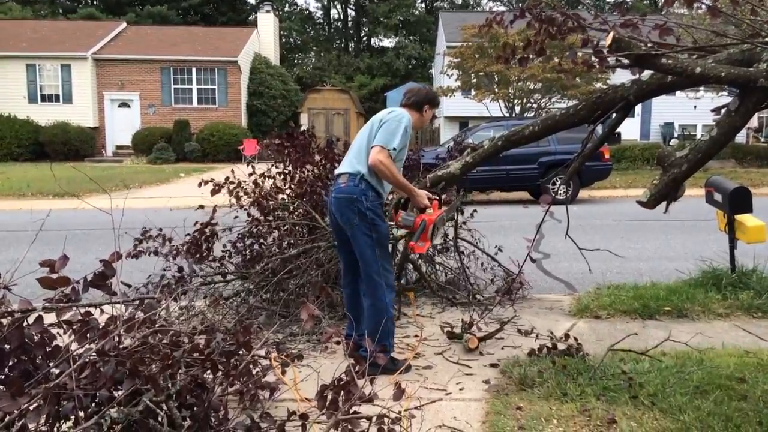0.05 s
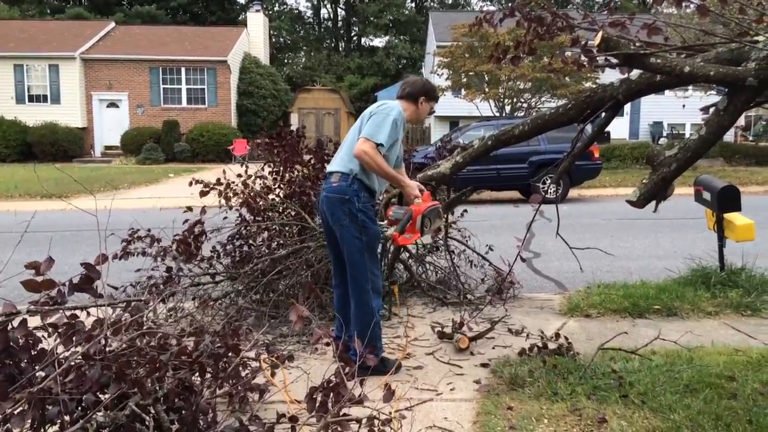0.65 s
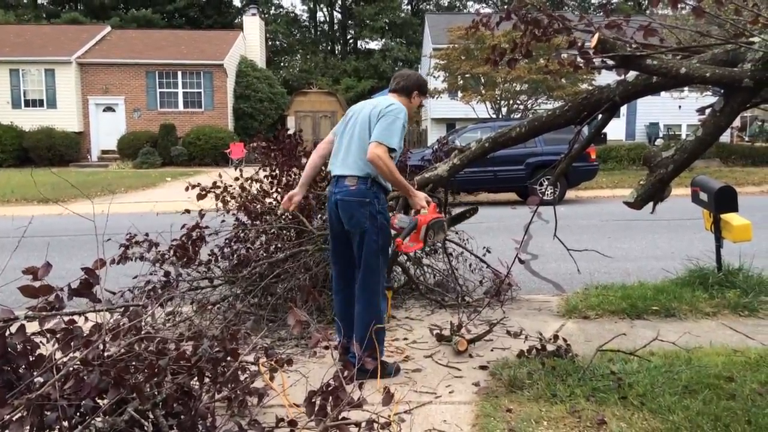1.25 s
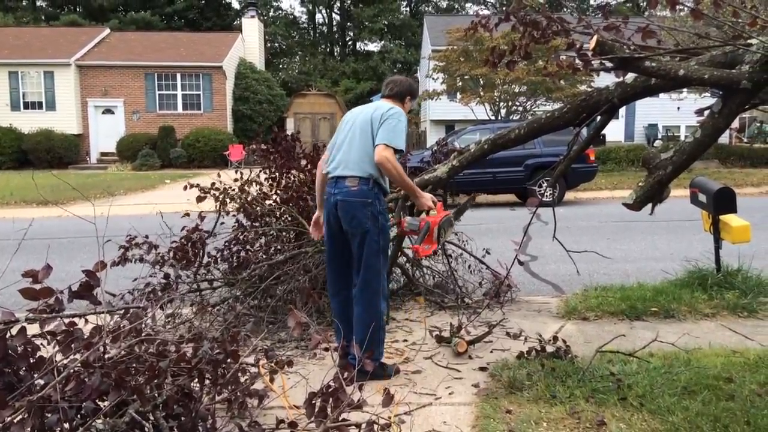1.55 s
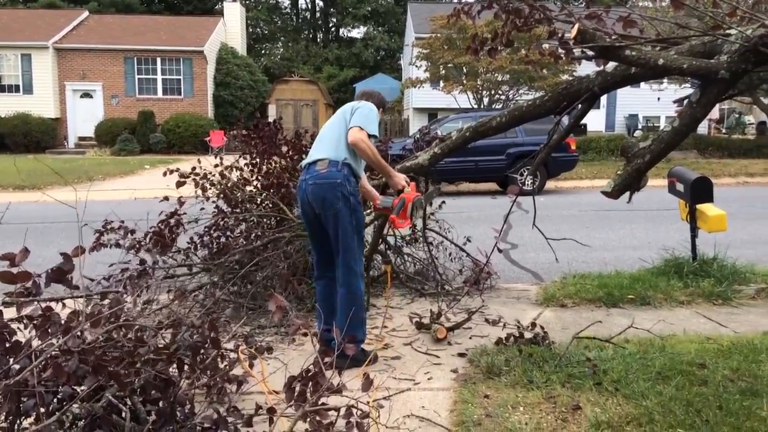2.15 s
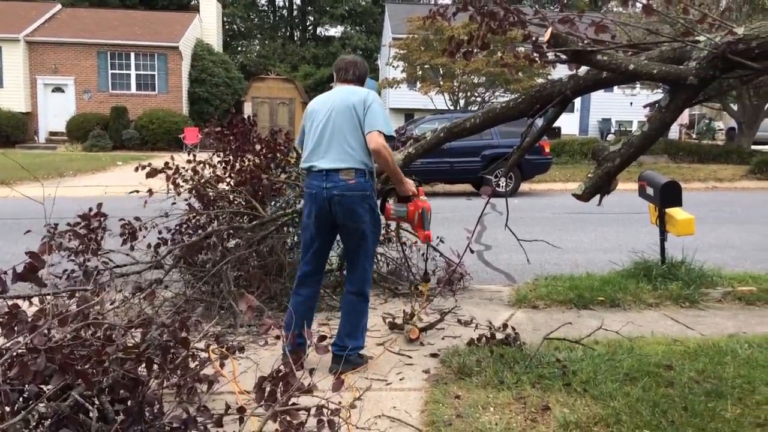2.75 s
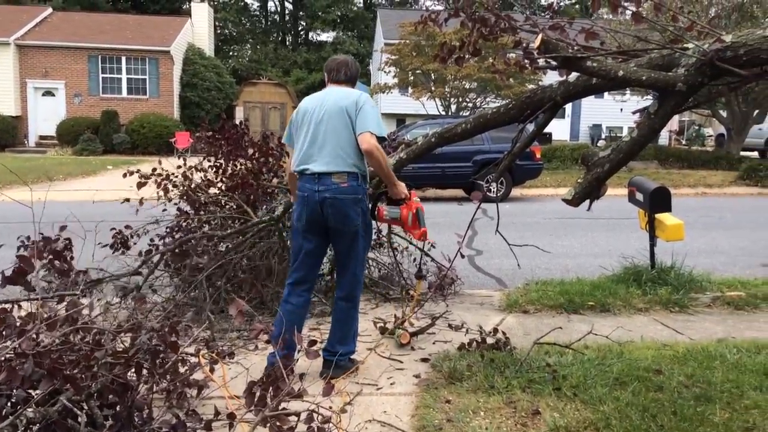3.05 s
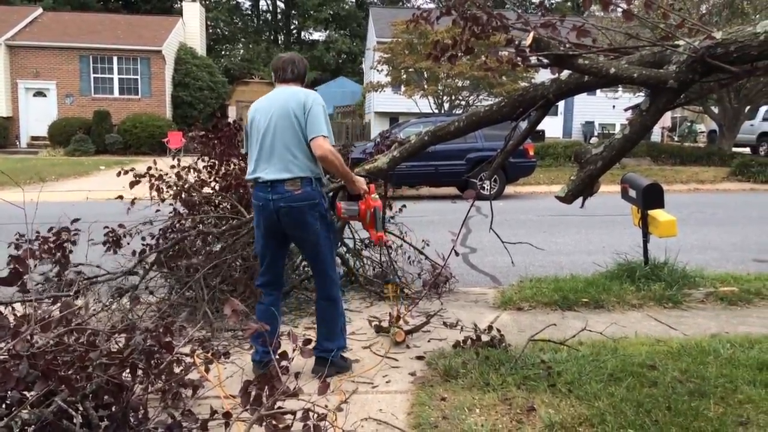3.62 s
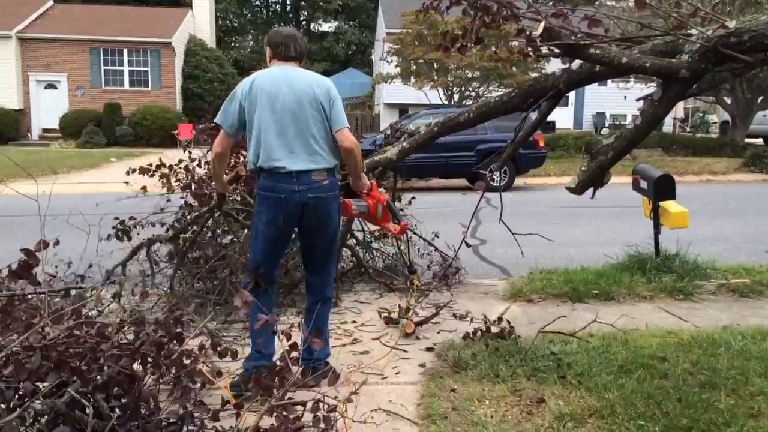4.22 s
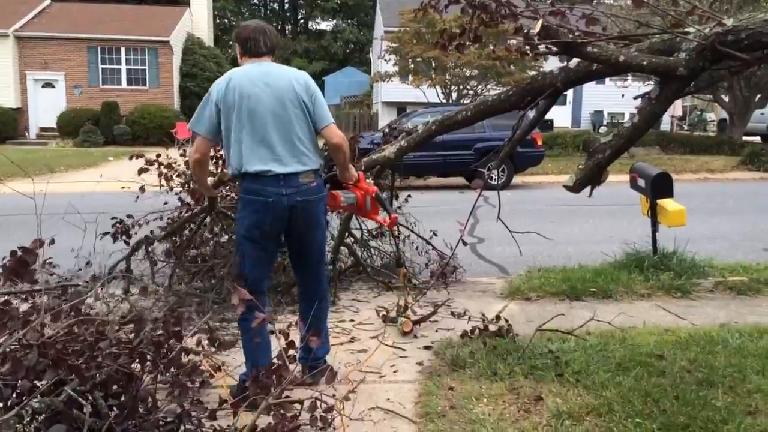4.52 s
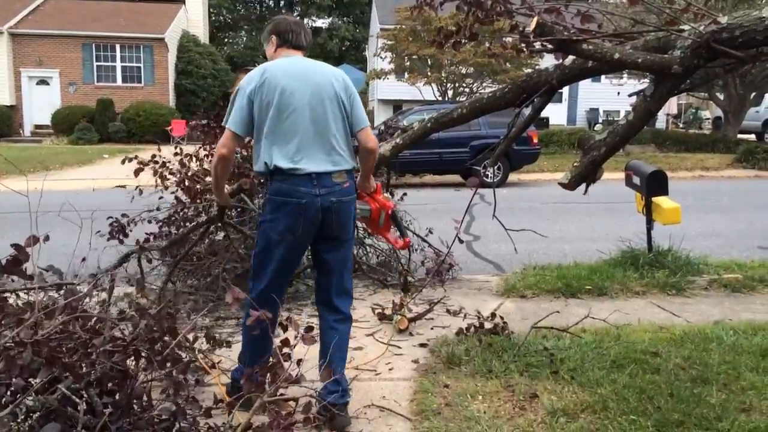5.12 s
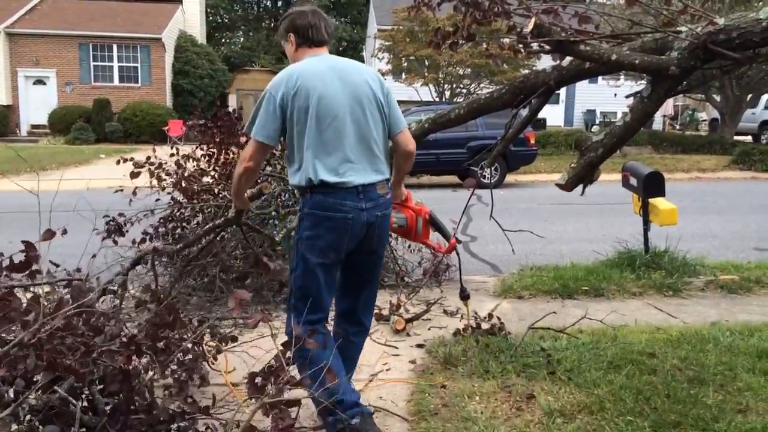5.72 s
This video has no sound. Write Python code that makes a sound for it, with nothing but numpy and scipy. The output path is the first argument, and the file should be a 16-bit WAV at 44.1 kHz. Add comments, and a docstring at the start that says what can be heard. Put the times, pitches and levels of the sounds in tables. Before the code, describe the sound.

A dry stick breaks close by right at the start, with a loud, splintering crack. A quieter stretch follows, with small twig snaps and a few faint puffs of wind on the microphone. At about 1.8 seconds a branch knocks and leaves rustle briefly. From 2.4 to 3.1 seconds leafy branches are dragged over concrete, with crackling leaves, snapping twigs and dull scraping. Stronger surges come from about 3.8 to 5 seconds, with sharp snaps at 3.9 and 4.7 seconds and a short creaky judder of stems at 4.9. The rustling eases, then swells again near 5.8 seconds. Soft footsteps land at about 3.1, 4.4 and 5.6 seconds. Behind it all, a distant bird twitters in short, thin, high runs over the low hum of far traffic. The place is a quiet suburban street with only faint echoes.

```python
"""Dragging cut branches

Leafy branches are pushed and dragged over a pavement beside a quiet suburban street.
A dry stick breaks, leaves rustle in surges, twigs snap, knock and judder, stems grind on the
concrete and shoes thud. A distant bird twitters above a low street hum, puffs of air rumble,
and the ground and the house fronts return faint echoes."""
import sys
import numpy as np
from scipy import signal
from scipy.fft import rfft, irfft
from scipy.io import wavfile

SR = 44100
rng = np.random.default_rng(int(sys.argv[2]) if len(sys.argv) > 2 else 0)


def bounce(signal):
    """Save signal as a 16-bit WAV file at the path given by the first command-line argument."""
    frames = np.transpose(np.atleast_2d(signal))
    limited = np.clip(frames, -1, 1)
    pcm = np.round(limited * 32767).astype(np.int16)
    wavfile.write(sys.argv[1], SR, pcm)


N = 258867
TIME = np.arange(N) / SR


# Pulls on the branches. Each row: time of full force, build-up, hold and let-go in seconds, base
# leaf level in dB, then twig, ground and sheen levels in dB relative to it.
# Build-up and let-go are the times for a change of 20 dB. Sheen is the bright hiss of leaf edges.
BRANCH_PULLS = [(1.856, 0.022, .03, .1, -52, -9, -15, -3),
                (1.911, 0.034, 0.014, 0.036, -43, 3, -10.5, -1.5),
                (2.19, 0.11, 0.12, .2, -63.5, 3, 1.5, -12), (2.445, 0.24, 0.062, .1, -52.5, 2, -8, 2),
                (2.562, 0.1, 0.15, .2, -48, 2.5, -7.5, 3), (2.769, 0.021, .22, .19, -34.5, -1, -6, -3.5),
                (3.104, 0.052, 0.021, 0.028, -43, 6, -20, 4.5), (3.455, .03, .02, 0.028, -48, -8, -10, -7),
                (3.896, 0.12, 0.031, 0.081, -34.5, 2.5, -3, 0.5),
                (4.044, 0.38, 0.16, .19, -39.5, 3, -11.5, -3),
                (4.546, 0.18, 0.052, .1, -47.5, 8.5, -1.5, 0),
                (4.68, 0.11, 0.016, 0.05, -32.5, 2, -22, -1.5), (4.724, .04, 0.22, 0.15, -38, 2, -12, -4),
                (5.141, 0.21, 0.037, 0.12, -47.5, -4, -6.5, -9),
                (5.387, 0.3, 0.18, 0.6, -55.5, 4.5, 2.5, -19), (5.85, 0.56, .03, .2, -43, 0, -14, -4.5)]
# The pile never lies quite still. Base levels at rest in dB: leaves, twigs, ground, sheen.
RESTING_DB = [-77.5, -68, -70, -91]

def pull_levels(settle_s=0.14, tremble_db=-10):
    """Each pull swells and leaves a trembling behind. Gives dB curves: leaves, twigs, ground, sheen."""
    power = 0
    for peak, rise, hold, fall, db, twig_db, ground_db, sheen_db in BRANCH_PULLS:
        before = np.maximum(peak - TIME, 0)
        after = np.maximum(TIME - peak - hold, 0)
        swell_db = np.maximum(-20 * (before / rise + after / fall), -100)
        balance = undb([[0], [twig_db], [ground_db], [sheen_db]])
        power = power + (undb(db + swell_db) * balance) ** 2
    leak = 1 / (settle_s * SR)
    trembling = undb(tremble_db) ** 2 * signal.lfilter([leak], [1, leak - 1], power)
    resting = undb(RESTING_DB)[:, None] ** 2
    spurts_db = 0.52 * wander(22)
    return 10 * np.log10(power + trembling + resting) + spurts_db


def dragged_branches(leaf_db, twig_db, ground_db, sheen_db):
    """Leaves, twigs and stems rub as one bundle, catching and letting go together."""
    catch = undb(2 * wander(55))
    rate = 5000 * undb(0.59 * (leaf_db + 40))  # harder pulls bring more contacts a second
    return (rustling_leaves(rate, catch, leaf_db - 1.5, sheen_db)
            + scratching_twigs(rate, catch, twig_db - 2.7)
            + grinding_stems(catch, ground_db - 1))


# The tone of leaves, and of their edges. Each row: frequency in Hz, gain in dB.
LEAF_TONE = [(1000, -16.5), (2500, -2), (3700, 5), (7500, -2.5), (9500, -17.5), (15000, -25)]
SHEEN_TONE = [(5000, -7), (7500, 5), (9500, 2.5), (12000, -0.5), (15500, -9)]

def rustling_leaves(rate, catch, leaf_db, sheen_db):
    """Leaves flick each other, their dry tips crackle in clusters and their edges add a bright hiss."""
    flicks, edges = (contacts(rate, 1.35) / np.sqrt(rate) * catch for _ in range(2))
    cluster_fade = np.exp(-TIME[:2048] / 0.0015)
    clusters = signal.fftconvolve(np.abs(contacts(60, 3.4)), cluster_fade)[:N]
    tip_tone = [(1000, -12), (3500, -7), (7000, -6), (15000, -0.5)]
    crackle = colour(clusters * rng.standard_normal(N), tip_tone)
    rustle = unit(colour(flicks, LEAF_TONE)) + undb(-4.5) * unit(crackle)
    sheen = unit(colour(edges, SHEEN_TONE))
    return undb(leaf_db) * rustle + undb(sheen_db) * sheen


# The tone of scratching twigs. Each row: frequency in Hz, gain in dB.
TWIG_TONE = [(400, -7), (800, -2), (1300, 5), (1900, 4), (2400, 7), (3100, -23.5), (5000, -9)]

def scratching_twigs(rate, catch, db):
    """Twigs scratch; now and then a single one ticks and rings at its own pitch."""
    ticks = sum(resonate(contacts(6.4, 4.1), hz, hz / 20) for hz in np.geomspace(1100, 2900, num=24))
    scratches = contacts(rate / 2, 1.4) / np.sqrt(rate) * catch
    return undb(db) * (unit(colour(scratches, TWIG_TONE)) + undb(-5.5) * unit(ticks))


# The tone of stems on concrete. Each row: frequency in Hz, gain in dB.
GROUND_TONE = [(60, -17.5), (130, 3), (220, 0.5), (400, -3), (700, 1), (1000, -7), (2000, -20)]

def grinding_stems(catch, db):
    """Stems scrape over the concrete in a stream of tiny, dull bumps."""
    bumps = contacts(2200, 2.3) * catch
    return undb(db) * unit(colour(bumps, GROUND_TONE))


# Thicker twigs breaking. Each row: start in seconds, time the fibres take to part in seconds,
# crack level in dB, ring level in dB, pitch of the wood in Hz.
TWIG_SNAPS = [(0.7445, 0.005, -59, -56, 895), (0.7557, 0.014, -47.5, -50, 2380),
              (0.864, 0.004, -59, -49.5, 1380), (1.1738, 0.021, -44.5, -44.5, 2390),
              (1.229, 0.0074, -46.5, -68, 1730), (1.3008, 0.0077, -55, -64, 1860),
              (1.5634, 0.0041, -54, -63.5, 1870), (1.598, 0.007, -48.5, -75, 2060),
              (1.8397, 0.018, -44.5, -48, 3330), (1.894, 0.0034, -49, -41.5, 2070),
              (2.184, 0.00089, -50.5, -50.5, 2070), (2.3665, 0.005, -47, -46.5, 2580),
              (2.446, 0.025, -40, -58, 1380), (2.548, 0.014, -35.5, -71, 2590),
              (2.6097, 0.00076, -40.5, -43, 1680), (2.7054, 0.008, -29, -62, 3010),
              (2.7731, 0.013, -30.5, -33.5, 1430), (2.921, 0.01, -27.5, -59, 2470),
              (3.0802, 0.0018, -36.5, -33.5, 3360), (3.4884, 0.0025, -39.5, -48.5, 2210),
              (3.75, 0.011, -40.5, -46.5, 1860), (3.887, 0.0069, -21.5, -27, 1800),
              (4.08, 0.019, -54, -33, 2390), (4.371, 0.022, -35, -35.5, 2250),
              (4.386, 0.0034, -42, -33, 4490), (4.3998, 0.0023, -37.5, -33.5, 4580),
              (4.507, 0.00087, -46, -28.5, 2200), (4.7205, 0.0086, -19, -24, 1390),
              (5.236, 0.01, -47.5, -39, 1090), (5.434, 0.0087, -56, -46, 1900)]

def snapping_twigs():
    """The thicker twigs break one by one."""
    out = np.zeros(N)
    for start, length, crack_db, wood_db, hz in TWIG_SNAPS:
        add(out, start, snap(length, crack_db, wood_db, hz))
    return out


def snap(length, crack_db, wood_db, hz):
    """Parting fibres make a bright crack and set the twig ringing briefly."""
    fibres = fracture(length)
    crack = colour(fibres, [(300, -13), (1500, -5), (4000, 5), (7000, 5), (10000, 3), (15000, -2.5)])
    # a twig that hardly cracks stays whole and rings more purely
    width_hz = hz * np.clip(0.6 * undb(0.4 * (crack_db - wood_db)), 0.3, 1.2)
    wood = resonate(resonate(fibres, hz, width_hz), hz, 4 * width_hz)
    return at_level(crack, crack_db) + at_level(wood, wood_db)


def splintering_twigs(leaf_db, count=32, middle_hz=1840):
    """Small twigs give way at random, louder while the branches are being pulled."""
    out = np.zeros(N)
    for k, (when, size, pitch) in enumerate(rng.random((count, 3))):
        sample = int((k + when) / count * (N - 1))
        db = leaf_db[sample] - 3 + 8 * (size - 0.5)
        hz = middle_hz * 2 ** (pitch - 0.5)
        add(out, sample / SR, snap(length=0.0049, crack_db=db, wood_db=db - 3.5, hz=hz))
    return out


# A dry stick gives way in stages. Each row: start in seconds, base level in dB.
STICK_STAGES = [(0.1212, -35), (0.134, -23), (0.1555, -16), (0.1657, -15.5), (0.189, -34)]
# The tone of its cracks. Each row: frequency in Hz, gain in dB.
STICK_TONE = [(150, -41), (700, -20.5), (1300, -17), (2100, -6), (3000, -8.5), (4300, -3), (5500, -2),
              (7000, 2), (9500, -6), (13500, -6.5), (15500, -11)]

def breaking_stick(size=4096):
    """Every stage of the break is a crack that the pavement returns a moment later, with a crackle of
    splinters."""
    out, t = np.zeros(N), TIME[:size]
    for start, db in STICK_STAGES:
        bursts = (rng.standard_normal(size) * np.exp(-t / fade_s) for fade_s in (0.0009, 0.0005))
        first, second = (colour(flatten(burst) * (t < 0.003), STICK_TONE) for burst in bursts)
        splinters = colour(contacts(5000, 2.6, size) * np.exp(-t / 0.0031), STICK_TONE)
        add(out, start, at_level(first, db - 5))
        add(out, start + 0.002, at_level(second, db - 4.5) + at_level(splinters, db - 14))
    return out


# One stem judders past another. Each row: start in seconds, length in seconds, level in dB, pitch in Hz.
STEM_JUDDERS = [(4.896, 0.018, -20, 2700), (4.904, 0.036, -31.5, 2250), (4.942, 0.018, -24.5, 2430),
                (4.952, 0.025, -23.5, 2850), (5.484, 0.029, -47, 1850), (5.529, 0.029, -47.5, 1830),
                (5.554, 0.017, -47, 1800)]
# The ways a stem rings. Each row: multiple of the pitch, width in Hz, gain in dB.
STEM_RINGS = [(.55, 447, -30), (.85, 403, -5.5), (1.02, 346, 9.5), (1.9, 1200, -2.5), (3.4, 7050, -2.5)]

def juddering_stems(size=4096):
    """Bark sticks and slips in a short run of clicks that rings the stem."""
    out, t = np.zeros(N), TIME[:size]
    for start, length, db, hz in STEM_JUDDERS:
        slips = contacts(3500, 1.3, size) * arch(np.minimum(t / length, 1))
        ring = sum(undb(gain_db) * resonate(slips, ratio * hz, width_hz)
                   for ratio, width_hz, gain_db in STEM_RINGS)
        ring = colour(ring, [(400, -30), (1200, -1.5), (15000, -11)])
        length_db = 10 * np.log10(length / 0.01)  # a longer judder carries more energy
        add(out, start, at_level(ring, db + length_db))
    return out


# Bumps on a thick branch. Each row: start in seconds, base level in dB.
BRANCH_KNOCKS = [(1.7757, -38), (3.0802, -38)]
# The ways that branch rings. Each row: pitch in Hz, gain in dB, seconds to fade by 60 dB if left free.
BRANCH_RINGS = [(686, 0, 0.091), (1070, -5, 0.034), (1570, 1, 0.082), (1766, -1, 0.088),
                (2340, -2.5, 0.042), (2960, 1.5, 0.074)]

def knocked_branch(size=8192):
    """A bump sets a thick branch ringing; its bark gives a bright tick."""
    out, t = np.zeros(N), TIME[:size]
    ring = sum(undb(db - 60 * t / fade_s) * np.sin(2 * np.pi * hz * t + rng.uniform(0, 2 * np.pi))
               for hz, db, fade_s in BRANCH_RINGS)
    damping = undb(-np.minimum(t * 2200, 12))  # the branches around it soon damp the first swing
    bark_tone = [(400, 15), (700, 11), (2500, 8), (4500, -1), (7000, 4.5), (9300, 11.5), (15000, -8)]
    for start, db in BRANCH_KNOCKS:
        bark = colour(fracture(0.02, size), bark_tone)
        add(out, start, at_level(ring * damping, db + 3) + at_level(bark, db + 2))
    return out


# Shoes land on the pavement. Each row: start in seconds, level in dB, pitch in Hz.
FOOTSTEPS = [(3.08, -39.5, 338), (4.372, -39.5, 196), (5.611, -45, 457)]

def footsteps():
    """A sole lands with a short, dull thud."""
    out = np.zeros(N)
    for start, db, hz in FOOTSTEPS:
        thud = resonate(fracture(0.0023), hz, 0.56 * hz)
        add(out, start, at_level(resonate(thud, hz, hz), db))
    return out


# Runs of bird notes. Each row: time of the first note in seconds, number of notes, seconds between
# notes, top pitch in Hz, base level in dB.
BIRD_PHRASES = [(.002, 2, .074, 4360, -54.5), (.421, 3, .044, 4160, -59.5), (0.709, 3, .05, 4280, -59),
                (.833, 4, 0.047, 4205, -57), (1.36, 3, .048, 4260, -55.5), (1.532, 1, .05, 4360, -50.5),
                (2.169, 6, .053, 4300, -57), (3.337, 7, .061, 4310, -57.5), (5.333, 3, .053, 4310, -55)]

def bird(note_s=0.027, slide_hz=520, swell_db=5):
    """Quick, thin notes hold their top pitch, then slide down; no two fall alike."""
    out = np.zeros(N)
    for first, count, spacing, top_hz, db in BIRD_PHRASES:
        # notes placed later in a run tend to be louder and to fall further
        for k, place in enumerate(np.linspace(-0.5, 0.5, round(count))):
            late, detune, stretch, loud = rng.uniform(-0.91, 1, 4)
            progress = np.linspace(0, 1, int(note_s * (1 + 0.2 * stretch) * SR))
            fall = (1 + 1.05 * place + 0.3 * stretch) * (progress - 0.2) ** 2
            hz = top_hz * (1 + 0.01 * detune) - slide_hz * fall
            quaver = 1 + 0.35 * np.sin(2 * np.pi * (1.7 * progress + rng.random()))
            note = sine(hz) * arch(progress) * quaver
            start = first + k * spacing + 0.006 * late - note_s / 2
            add(out, start, undb(db + swell_db * place + 2 * loud) * unit(note))
    return out


# The tone of far traffic. Each row: frequency in Hz, gain in dB.
TRAFFIC_TONE = [(15, -16), (25, -28.5), (59, -11), (152, -5), (267, -19), (297, -13), (359, -22),
                (433, -18.5), (482, -22.5), (722, -23.5), (2770, -34), (4150, -30.5), (4620, -33),
                (6380, -36), (15500, -46.5)]

def street(traffic_db=-53, hum_db=-57.5, hum_hz=96.2):
    """Far traffic murmurs along with a low, wavering hum."""
    traffic = unit(colour(rng.standard_normal(N), TRAFFIC_TONE)) * undb(traffic_db + 0.13 * wander(3.2))
    waver = undb(2 * wander(12))
    hum = sine(hum_hz + 2.47 * wander(10)) * waver
    return traffic + undb(hum_db) * unit(hum)


# Puffs of air. Each row: start in seconds, length in seconds, level in dB.
AIR_PUFFS = [(0.238, 0.058, -53), (0.328, 0.067, -49.5), (0.458, 0.086, -51), (1.711, 0.058, -54)]

def breeze():
    """Light puffs of air rumble briefly on the microphone."""
    out = np.zeros(N)
    rumble_tone = [(20, -17), (55, -7), (90, -9), (200, -42), (800, -52)]
    for start, length, db in AIR_PUFFS:
        swell = np.hanning(int(length * SR))
        rumble = colour(rng.standard_normal(SR), rumble_tone)[-len(swell):]
        add(out, start, undb(db) * unit(rumble * swell))
    return out


def outdoors(x, near_db, far_db):
    """Add quick echoes from the ground and branches, then a duller tail from the house fronts."""
    near = echoes(fade_s=0.25, delay_s=0.0032)
    far = colour(echoes(fade_s=0.98, delay_s=0.025), [(300, 3.5), (2500, 5.5), (6000, -1.5)])
    return x + signal.fftconvolve(x, undb(near_db) * near + undb(far_db) * far)[:N]


def echoes(fade_s, delay_s):
    """A fading spray of reflections with a total energy of 1."""
    t = TIME[:SR]
    fade = undb(-60 * t / fade_s) * (t > delay_s)
    tail = flatten(rng.standard_normal(SR) * fade) * np.sqrt(fade)
    return tail / np.sqrt(np.sum(tail ** 2))


def contacts(rate, spread_db, size=N):
    """Tiny random impacts, about rate a second: most are small, a few are large."""
    happens = rng.random(size) < rate / SR
    strength = undb(spread_db * np.minimum(rng.exponential(size=size), 4))
    return happens * strength * rng.choice([-1, 1], size)


def fracture(length, size=4096):
    """A quick run of clicks, as when fibres part, fading over length seconds."""
    return contacts(12000, 8, size) * np.exp(-1.5 * TIME[:size] / length)


def wander(rate):
    """A random curve of typical size 1 that heads for a new value rate times a second."""
    targets = rng.standard_normal(4096)
    return unit(np.interp(TIME * rate, np.arange(len(targets)), targets))


def colour(x, points, size=4096):
    """Shape the tone of a sound along a curve of (Hz, dB) points."""
    hz, db = np.transpose(points)
    grid_hz = np.arange(size // 2 + 1) * SR / size
    log_gain = np.log(undb(np.interp(np.log(grid_hz + 1), np.log(hz), db)))
    # build the filter so that it rings only after a click, never before it
    cepstrum = irfft(log_gain)[:size // 2]
    cepstrum[1:] *= 2
    click_response = irfft(np.exp(rfft(cepstrum, size)))
    return signal.fftconvolve(x, click_response)[:len(x)]


def resonate(x, hz, width_hz):
    """Make a sound ring at one pitch; a narrower width rings longer."""
    return signal.lfilter(*signal.iirpeak(hz, hz / width_hz, fs=SR), x)


def flatten(x):
    """Make all frequencies in a burst equally strong, keeping its timing."""
    spectrum = rfft(x)
    return irfft(spectrum / (np.abs(spectrum) + 1e-9), len(x))


def sine(hz):
    """A pure tone that follows a changing pitch."""
    return np.sin(2 * np.pi * np.cumsum(hz) / SR)


def arch(progress):
    """A rounded rise and fall as progress goes from 0 to 1."""
    return np.sqrt(np.abs(np.sin(np.pi * progress)))


def undb(db):
    """Turn decibels into a gain."""
    return 10 ** (np.asarray(db) / 20)


def unit(x):
    """Scale a sound to an average (rms) level of 1."""
    return x / np.sqrt(np.mean(x ** 2))


def at_level(x, db):
    """Scale a short sound so that its energy, spread over 10 ms, has this level."""
    return x * undb(db) * np.sqrt(SR * 0.01 / np.sum(x ** 2))


def add(out, start_s, x):
    """Mix a short sound in at its start time."""
    start = int(max(start_s, 0) * SR)
    out[start:start + len(x)] += x[:max(N - start, 0)]


def scene():
    """The branches close by, the bird far off, the street and breeze behind them."""
    leaf_db, twig_db, ground_db, sheen_db = pull_levels()
    hits = snapping_twigs() + breaking_stick() + knocked_branch() + juddering_stems()
    hits += footsteps() + splintering_twigs(leaf_db)
    dragging = dragged_branches(leaf_db, twig_db, ground_db, sheen_db)
    close = outdoors(dragging + hits, near_db=-13.5, far_db=-27)
    distant = outdoors(bird(), near_db=-8, far_db=-23)
    return (close + distant + street() + breeze())[None]


def record(dry):
    """Round off the loudest peaks and cut the highest treble."""
    top_hz = 15450
    rounded = dry / (1 + dry ** 4) ** 0.25
    return signal.sosfilt(signal.ellip(8, 0.2, 70, top_hz, fs=SR, output="sos"), rounded)


dry = scene()
out = record(dry)
bounce(out)
```